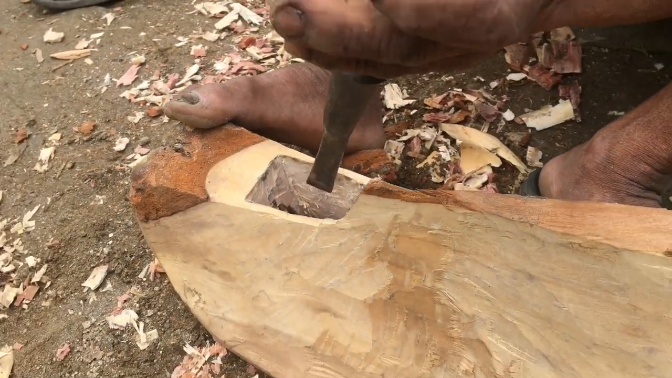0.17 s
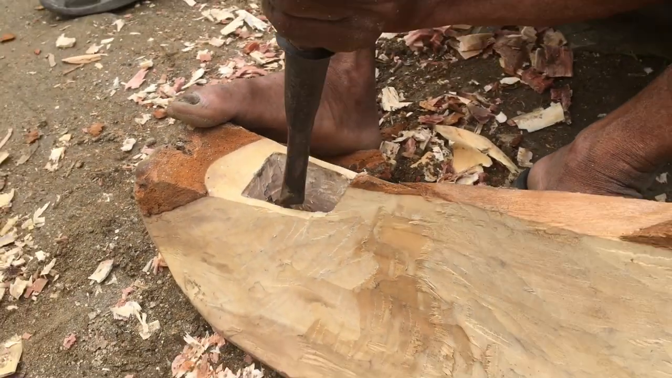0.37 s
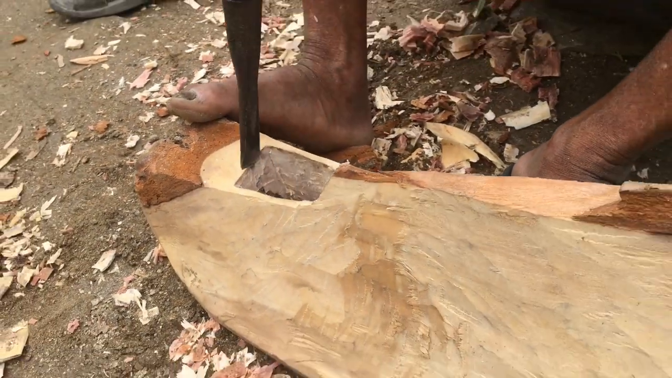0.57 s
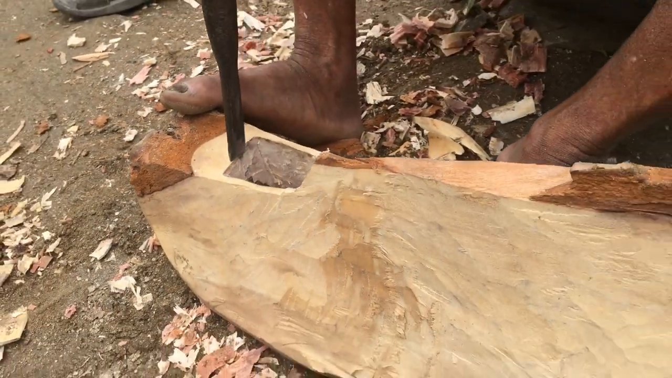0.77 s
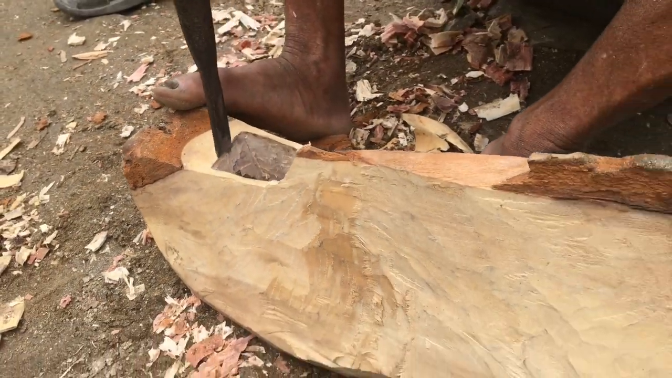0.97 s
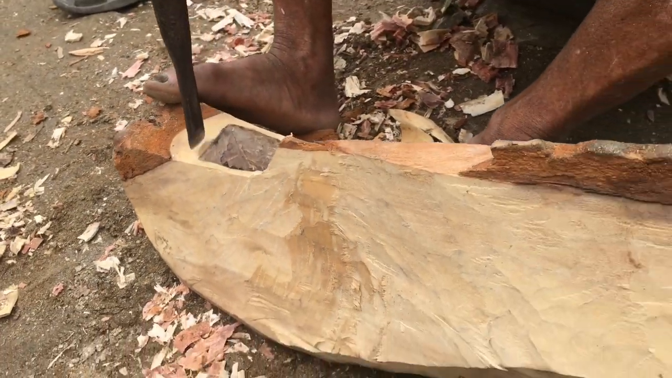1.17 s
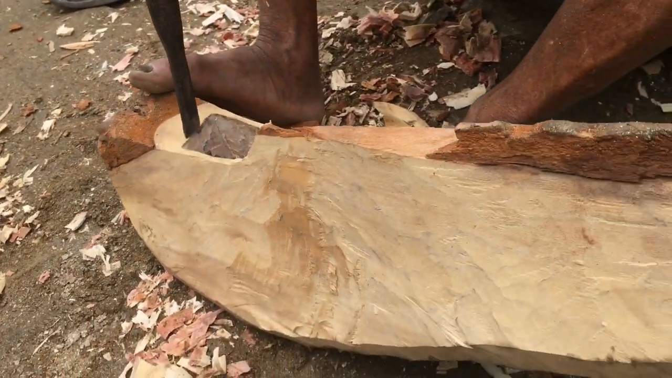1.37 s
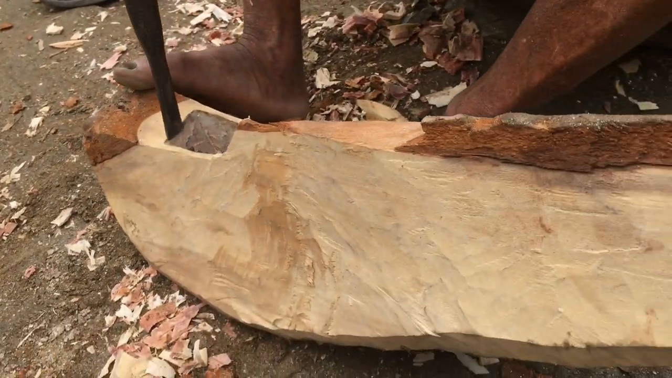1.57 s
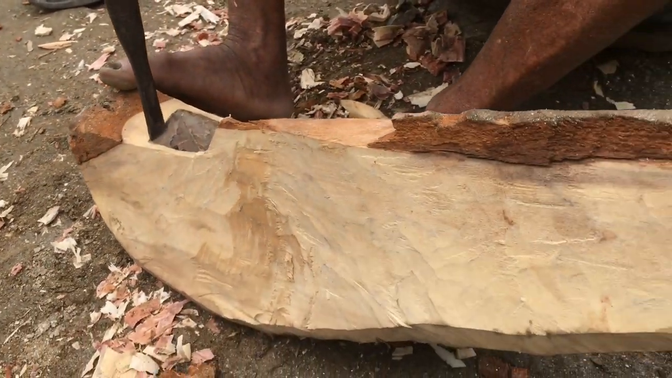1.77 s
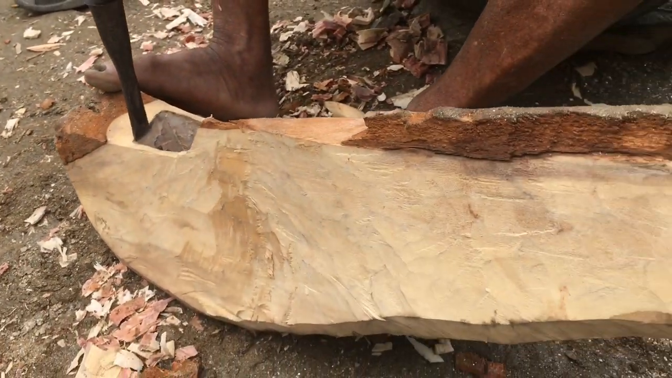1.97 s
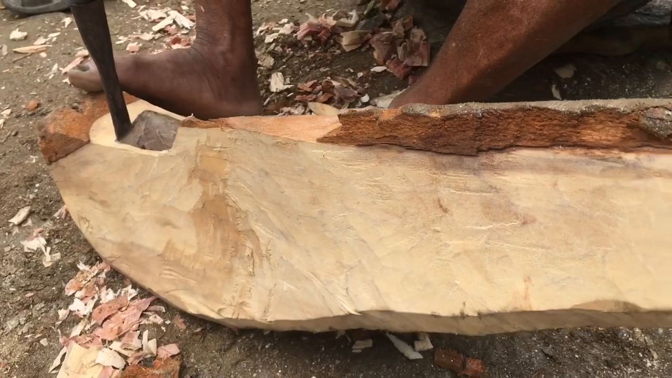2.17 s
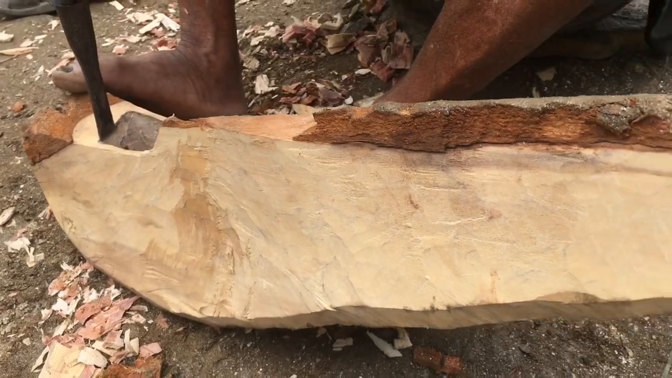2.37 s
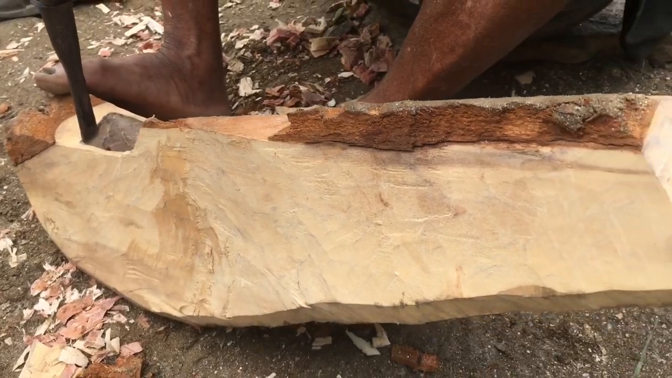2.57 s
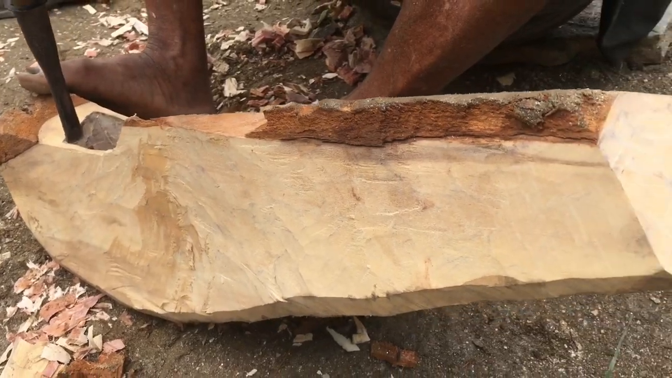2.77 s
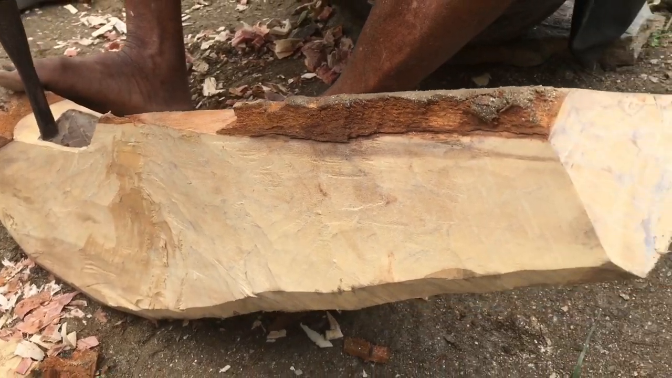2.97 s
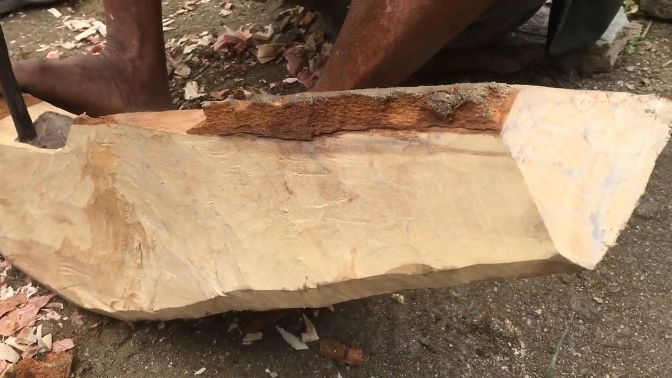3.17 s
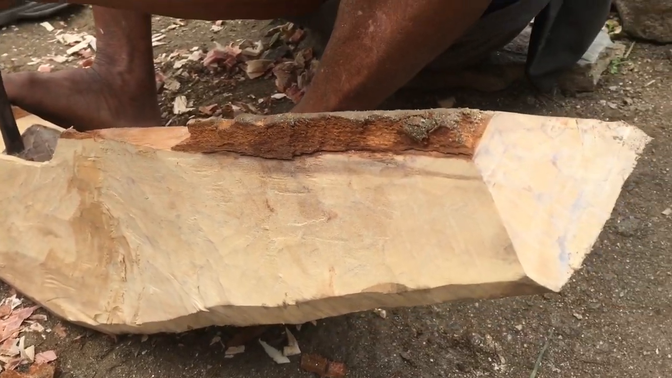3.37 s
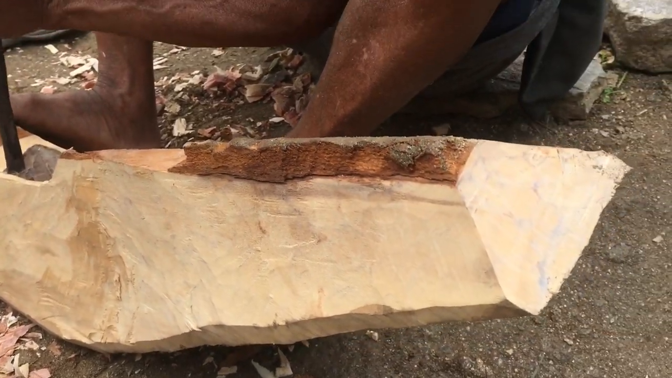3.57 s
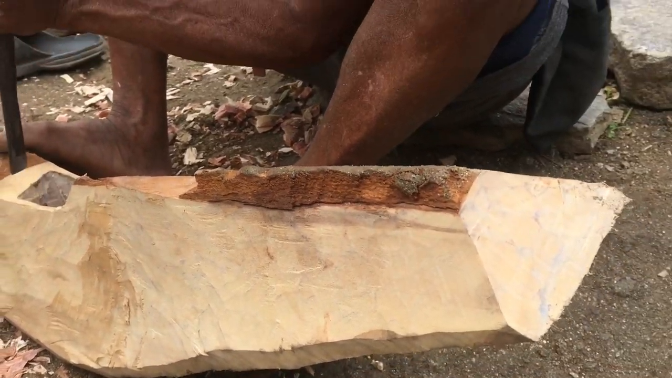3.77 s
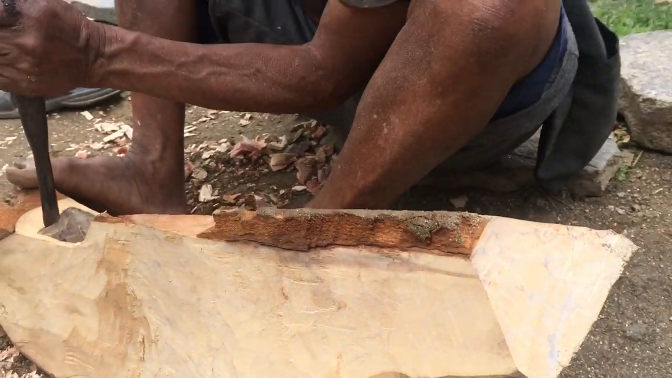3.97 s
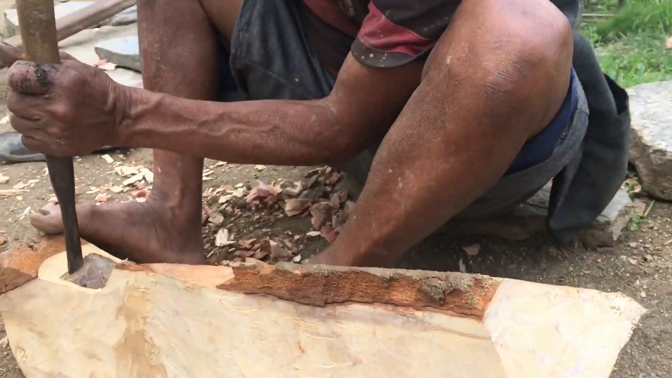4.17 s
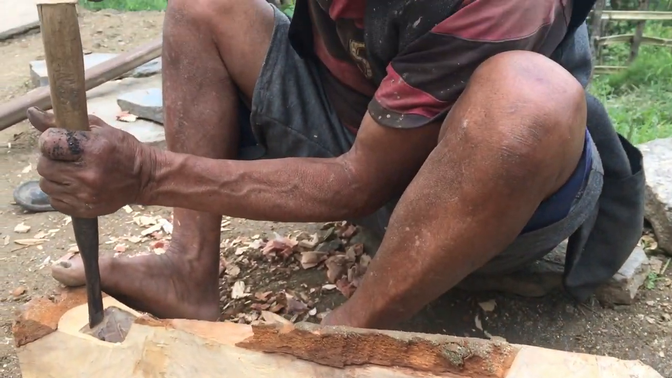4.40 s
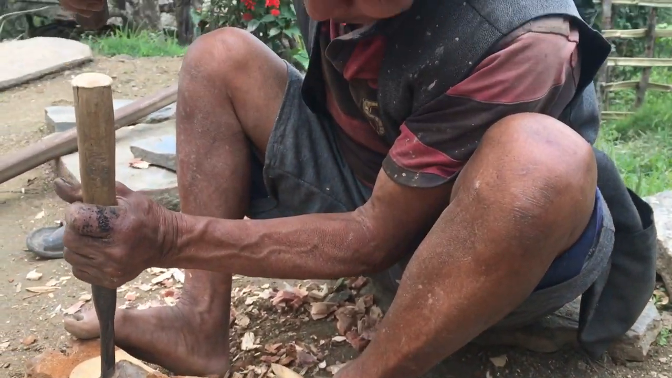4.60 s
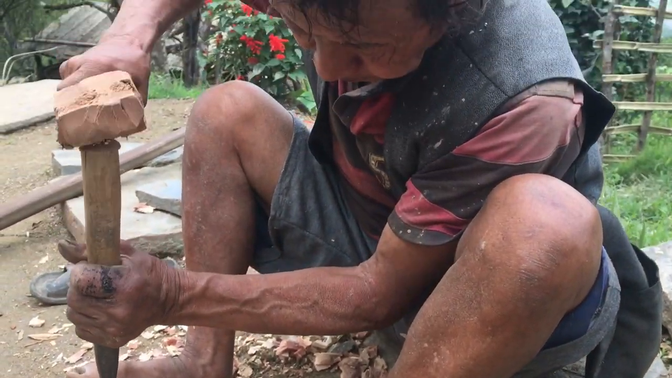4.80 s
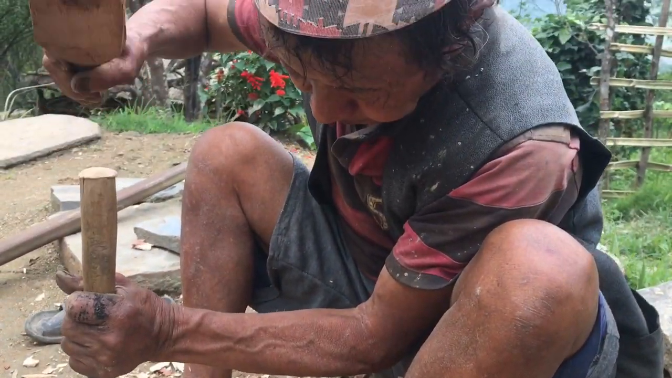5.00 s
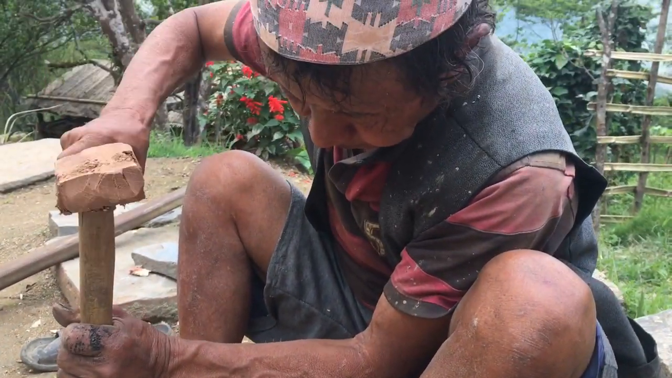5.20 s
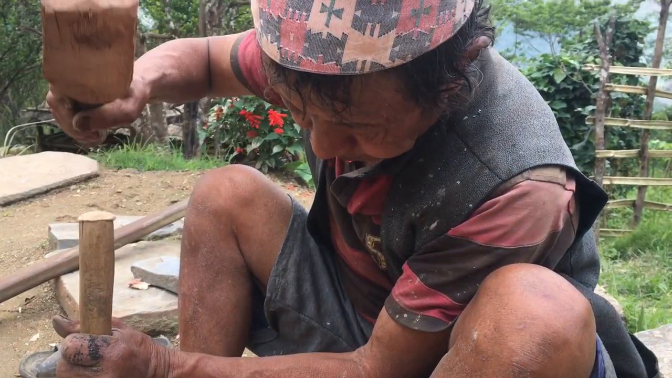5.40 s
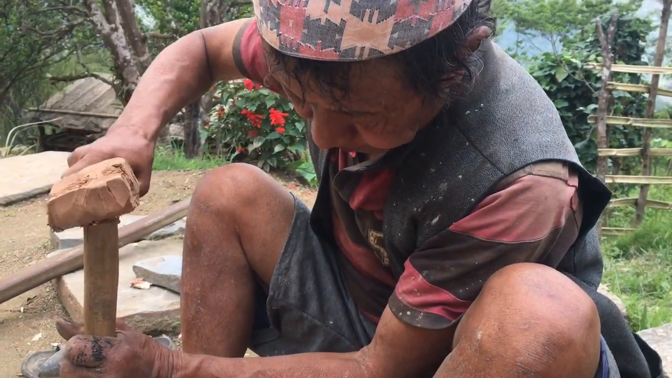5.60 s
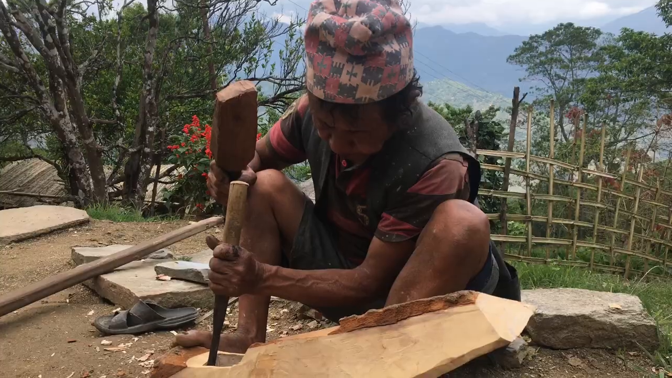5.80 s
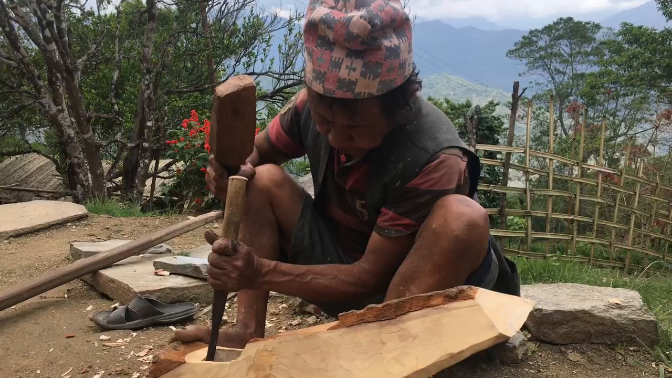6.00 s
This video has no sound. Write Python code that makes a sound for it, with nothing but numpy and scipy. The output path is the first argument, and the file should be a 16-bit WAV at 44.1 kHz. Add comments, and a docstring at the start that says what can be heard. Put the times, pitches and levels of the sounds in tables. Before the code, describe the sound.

A quiet outdoor place, heard in mono close to the work: faint steady insect hiss around 5 kHz, soft leaves, a low far rumble and small lumpy wind buffets, strongest near 3.35 s. Thin gliding bird notes are far off, mostly early. At 0.3-0.5 s a chisel is set on a thick plank with light woody ticks; a dull distant wood knock and a chip snap come at 1.2 s, another small tap near 1.6. A wooden mallet hits the chisel at 2.37 s, harder at 2.73 and 3.11: loud, short, dry cracks with hollow plank tone, low thud and brief grainy echo. In the pause, faint hums and scrapes at 4.1-4.6 s as the blade shifts. Blows return at 4.76, with bright splinters snapping just after, then 5.16 and 5.55, the last strongest. Sound fades quickly to silence by 5.7 s.

```python
"""Outdoors, far insects hiss as bands of noise, leaves rustle, a valley rumbles and gusts buffet the microphone.
Far birds whistle in gliding notes, mostly early on, and dull wood knocks a long way off as decaying noise and tone.
A chisel blade is set down on a thick plank with soft ticks; a wooden mallet then drives it three times, as
bursts of noise and damped modes with echoes. The blade is shifted, the plank hums, single chips snap, and
three more blows fall. The sound fades to silence shortly after the last."""
import sys
import numpy as np
from scipy import signal
from scipy.fft import rfft, irfft, next_fast_len
from scipy.io import wavfile
from scipy.ndimage import uniform_filter1d, map_coordinates

SR = 44100
rng = np.random.default_rng(int(sys.argv[2]) if len(sys.argv) > 2 else 0)


def waveform_to_disk(signal):
    """Save audio, clipped to [-1, 1], as 16-bit WAV at the path in sys.argv[1]."""
    frames = np.transpose(np.atleast_2d(signal))
    scaled = np.clip(frames, -1, 1) * 32767
    samples = np.round(scaled).astype(np.int16)
    wavfile.write(sys.argv[1], SR, samples)


N = 266628

# mallet blows and how strongly each part sounds: t/s, crack level/dB, crack f/Hz, then level/dB of
# ground thud, plank low, plank ring, plank mid, hole, handle, mallet, blade, splinters
BLOWS = [(2.368, -15, 3340, -22.5, -23, -27.5, -29.5, -28, -22, -20.5, -31.5, -30),
         (2.7333, -8, 3970, -18.5, -20, -16.5, -26.5, -25, -14, -23, -22, -25.5),
         (3.1053, -9.5, 3350, -16, -19, -17.5, -23, -28, -16, -18.5, -22, -28),
         (4.755, -14, 3340, -22, -17, -34, -22.5, -19.5, -25, -16.5, -24, -17),
         (5.1638, -7.5, 3240, -20, -15.5, -28, -19.5, -21, -21, -20, -20.5, -29),
         (5.5547, -5, 3450, -19, -16.5, -26, -19, -21, -21, -18.5, -22.5, -28)]
# damped modes of the plank's ring, the handle and the mallet: f/Hz, level/dB, t60/s
PLANK_RING = [(522.5, 0.0053, .12)]
HANDLE = [(1080.2, 2, 0.033), (1203, -14, 0.053)]
MALLET = [(1418, -5, 0.037), (1622.3, 2.5, 0.024)]
# colour of splinters and chips: f/Hz, level per Hz/dB
SPLINTERS = [(4500, -24), (6200, 2.5), (9000, -3.5), (13000, -7), (16000, -14.5)]

DRIFT_DB = 1.2  # scale of the slow drift of rumble and leaves


def amp(db):
    """A level in decibels is the logarithm of an amplitude ratio."""
    return 10 ** (np.asarray(db) / 20)


def unit(x):
    """Dividing by the root mean square gives a signal unit power."""
    return x / np.sqrt(np.mean(x ** 2) + 1e-20)


def along(points, hz):
    """Spectra are interpolated between (f/Hz, value) points on a logarithmic frequency axis."""
    f, v = np.transpose(points)
    return np.interp(np.log(hz + 1), np.log(f + 1), v)


def wobble(rate):
    """Band-limited fluctuation: a smooth curve through random knots, rate knots a second."""
    knots = rng.standard_normal(int(N * rate / SR) + 4)
    return map_coordinates(knots, [np.arange(N) * rate / SR])


def noise(spectrum, size=N):
    """Filtering: white noise weighted in frequency takes the given colour, at rms 1."""
    m = next_fast_len(size)
    white = rfft(rng.standard_normal(m))
    colour = amp(along(spectrum, np.fft.rfftfreq(m, 1 / SR)))
    return unit(irfft(white * colour, m)[:size])


def puff(hz, size):
    """Spectral weighting: broad noise that peaks around one pitch."""
    return noise([(hz / 4, -22), (hz * 0.67, -7), (hz, 0), (hz * 1.5, -7), (hz * 3, -18)], size)


def patchy(x, patchy_db):
    """Time-frequency modulation: patches of random gain, patchy_db rms, make a steady noise uneven."""
    z = signal.stft(x, nperseg=512)[2]
    across_frequency = uniform_filter1d(rng.standard_normal(z.shape), 5, 0)
    field = uniform_filter1d(across_frequency, 12, 1)
    return unit(signal.istft(z * amp(patchy_db * unit(field)), nperseg=512)[1][:N])


def ring(modes, t, rise):
    """Modal decay: damped sinusoids that build up with the time constant rise while contact lasts."""
    t = np.maximum(t, 0)
    decaying = sum(amp(db - 60 * t / t60) * np.sin(2 * np.pi * hz * t) for hz, db, t60 in modes)
    return (1 - np.exp(-t / rise)) * decaying


def note(length, first_hz, last_hz, blur):
    """Frequency glide, fastest at first; blur turns the tone into a fluttering narrow band."""
    u = np.linspace(0, 1, int(length * SR))
    hz = last_hz + (first_hz - last_hz) * (1 - u) ** 1.3
    phase = 2 * np.pi * np.cumsum(hz) / SR
    knots = rng.standard_normal((2, int(length * 350) + 4))
    a, b = (map_coordinates(k, [u * (len(k) - 1)]) for k in knots)
    swell = np.sin(np.pi * u) ** .5
    return swell * ((1 - blur + blur * a) * np.sin(phase) + blur * b * np.cos(phase))


def bursts(rows, edge):
    """Amplitude envelope: superposed swells (t/s, length/s, level/dB) with soft edges."""
    t = np.arange(N) / SR
    total = np.zeros(N)
    for s, length, db in rows:
        to_nearest_end = np.minimum(t - s, s + length - t)
        total += amp(db) * np.clip(to_nearest_end / edge + .5, 0, 1) ** 2
    return total


def add(track, s, sound):
    """Superposition: mix a sound in at time s."""
    part = track[round(s * SR):][:len(sound)]
    part += sound[:len(part)]


def echoes():
    """Diffuse reverberation of unit energy: each frequency decays at its own rate, two walls stand out."""
    # decay of the echoes: f/Hz, t60/s
    yard_t60 = [(100, 0.053), (500, 0.11), (1200, 0.21), (2500, 0.15), (4000, .16), (7000, 0.074),
                (15000, 0.056)]
    # colour of the echoes: f/Hz, level/dB
    yard_tone = [(100, -12), (350, 0.5), (1000, -1), (2000, -7.5), (3000, -18), (5000, -21.5), (8000, -27),
                 (15000, -31)]
    # slaps within the echoes: delay t/s, level relative to the echoes there/dB
    wall_slaps = [(0.02, -6), (.033, 1)]
    hz, t, z = signal.stft(rng.standard_normal(SR // 2), SR, nperseg=256)
    dying_db = -60 * t / along(yard_t60, hz)[:, None]
    fall = amp(dying_db) + amp(-22.5 + 0.37 * dying_db)  # the slopes further off answer longer
    tail = signal.istft(z * amp(along(yard_tone, hz))[:, None] * fall, SR, nperseg=256)[1]
    t = np.arange(len(tail)) / SR
    slaps = sum(amp(db - 60 * np.maximum(t - s, 0) / 0.067) * (t > s) for s, db in wall_slaps)
    tail = tail * (1 + slaps)
    tail = tail * amp(3.2 * wobble(220)[:len(t)])  # scattered, grainy returns
    return tail / np.linalg.norm(tail)


def add_echoes(track, s, sound, echo_db):
    """Energy scaling: the echoes follow the sound's energy, not its ring."""
    add(track, s, np.linalg.norm(sound) * amp(echo_db) * echoes())


def insects():
    """Band noise: far insects merge into a steady hiss."""
    # f/Hz, level per Hz/dB
    insect_colour = [(1760, -46), (3000, -18.5), (3440, -12.5), (3730, -10.5), (4730, -1), (5270, -5),
                     (5820, -11.5), (7500, -24.5), (9750, -51), (16500, -120)]
    return amp(-72.5) * patchy(noise(insect_colour), patchy_db=1.5)


def leaves():
    """Broadband noise whose level drifts slowly: a rustle of leaves."""
    # f/Hz, level per Hz/dB
    leaf_colour = [(300, -6.5), (600, 3.5), (1100, 0.5), (2000, -3.5), (3500, -12), (7000, -16.5),
                   (11000, -24), (16000, -18)]
    return amp(-74 + DRIFT_DB * wobble(1.9)) * patchy(noise(leaf_colour), patchy_db=2.5)


def valley():
    """Low-frequency noise whose level drifts: a far rumble."""
    # f/Hz, level per Hz/dB
    rumble_colour = [(70, -27.5), (120, 4), (190, 2), (300, -3.5), (450, -11), (700, -30.5)]
    return amp(-70.5 + DRIFT_DB * wobble(3)) * patchy(noise(rumble_colour), patchy_db=2.0)


def wind():
    """Amplitude-modulated low noise: gusts buffet the microphone in lumps."""
    # gusts: t/s, length/s, level/dB
    gust_rows = [(.02, .08, -68), (.46, 0.04, -55.5), (.53, 0.04, -55), (.595, 0.11, -53.5),
                 (.735, 0.038, -46), (.808, 0.029, -53), (.866, 0.025, -53), (1.0, .24, -56),
                 (1.393, .1, -56), (1.503, 0.093, -59), (1.63, 0.032, -67), (1.71, 0.29, -58.5),
                 (2.04, 0.085, -52), (2.155, 0.095, -58), (2.89, 0.14, -57), (3.27, 0.072, -55),
                 (3.345, 0.049, -38), (3.414, 0.033, -51), (3.5, 0.13, -53), (3.63, 0.237, -52.5),
                 (3.98, .06, -60), (4.11, 0.05, -51.5), (4.34, 0.052, -53.5), (4.41, 0.07, -47.5),
                 (4.66, 0.056, -58), (4.86, 0.055, -61), (5.02, 0.075, -67.5), (5.38, 0.23, -63.5)]
    # f/Hz, level per Hz/dB
    buffet_colour = [(12, -35), (20, -7.5), (38, -1), (58, 6), (118, -15.5), (156, -18), (200, -26),
                     (260, -54), (440, -120)]
    lull_db = -68  # remains between gusts
    gusts = amp(lull_db) + bursts(gust_rows, edge=.035)
    return gusts * unit(amp(3 * wobble(27)) * noise(buffet_colour))


def birds():
    """Gliding tones: the clearer notes, and a faint twitter of small birds, densest early on."""
    # far notes: t/s, length/s, first f/Hz, last f/Hz, level/dB, blur (0 tone, 1 narrow band)
    bird_notes = [(1.72, .042, 1230, 700, -68, .1), (1.782, .035, 1150, 740, -63, .1),
                  (1.848, .04, 1200, 800, -61, .1), (1.885, .03, 830, 870, -67, .1),
                  (2.535, .045, 1150, 820, -64, .1), (.09, .05, 4350, 4050, -70, .3),
                  (.505, .04, 4150, 4100, -71, .3), (.54, .05, 3900, 3050, -72, .5),
                  (.63, .07, 3900, 3900, -72, .3), (.75, .025, 4200, 3950, -71, .3),
                  (.975, .03, 4200, 3850, -71, .4), (2.97, .04, 3700, 3700, -72, .5),
                  (3.28, .03, 4050, 4050, -71, .5), (.855, .06, 4100, 3300, -72, .5),
                  (1.31, .06, 3900, 3100, -72, .5), (1.94, .22, 2450, 2450, -76, 1),
                  (2.19, .12, 2900, 2950, -75, 1), (3.01, .08, 3950, 4200, -71, .6),
                  (3.23, .03, 3950, 3950, -70, .5), (3.2, .3, 2600, 2550, -77, 1),
                  (4.46, .05, 1100, 880, -70, .6), (4.69, .05, 2720, 2720, -70, .4)]
    out = np.zeros(N)
    for s, length, first_hz, last_hz, db, blur in bird_notes:
        add(out, s, amp(db) * note(length, first_hz, last_hz, blur))
    for when, long, high, glide, loud in rng.random((10, 5)):
        hz = 3200 + 1100 * high
        chirp = note(.03 + .05 * long, hz + 700 * (glide - .3), hz, blur=.4)
        add(out, 5.5 * when ** 2, amp(-77 + 6 * loud) * chirp)
    return out


def far_knocks():
    """Exponential decay: a grainy rustle and a wavering plank tone that die away slowly."""
    # t/s, rustle level/dB, tone level/dB, rustle t60/s
    knock_rows = [(.0580, -62.5, -76, 0.12), (.7450, -69, -69, 0.06), (1.0450, -63.5, -78, 0.095),
                  (1.1970, -56, -59, 0.33), (2.0250, -69, -69.5, 0.19), (3.8850, -64.5, -79, 0.16)]
    # rustle colour: f/Hz, level per Hz/dB
    rustle_colour = [(250, -24), (500, 6.5), (1200, 2.5), (2200, -11), (5000, -19), (12000, -27)]
    out, t = np.zeros(N), np.arange(SR // 2) / SR
    for s, rustle_db, ring_db, t60 in knock_rows:
        rustle = amp(rustle_db + 0.31 * wobble(67)[:len(t)]) * noise(rustle_colour, len(t))
        tone = amp(ring_db + 1.2 * wobble(30)[:len(t)]) * np.sin(2 * np.pi * PLANK_RING[0][0] * t)
        tone = amp(25 * t / t60) * tone  # it outlasts the rustle
        add(out, s, (1 - np.exp(-t / 0.0041)) * amp(-60 * t / t60) * (rustle + tone))
    return out


def scuffs():
    """Clumped noise: dry chips rustle as they shift, and patter after every blow."""
    # chips shift: t/s, length/s, level/dB
    scuff_rows = [(0, 0.081, -78), (.195, 0.046, -72), (.28, 0.085, -74.5), (.46, .06, -81),
                  (2.775, 0.031, -66), (3.3, .15, -81.5), (4.795, 0.072, -69)]
    scatter_db, scatter_s = -65, .05  # chips thrown by a blow: level, how long they patter
    thrown = [(blow[0] + .01, scatter_s, scatter_db) for blow in BLOWS]
    rustle = unit(amp(2.9 * wobble(220)) * noise(SPLINTERS))
    return bursts(scuff_rows + thrown, edge=0.024) * rustle


def ticks():
    """Impulsive noise: single chips snap, short and bright, with echoes."""
    # t/s, level/dB, peak f/Hz
    snap_rows = [(0.2745, -52, 5300), (1.198, -49, 5900), (1.681, -53, 3750), (3.584, -63.5, 11080),
                 (4.7964, -54, 9460), (4.8336, -42, 6860), (4.847, -52, 4500)]
    t60_s, echo_db = 0.015, -6.5
    out, t = np.zeros(N), np.arange(SR // 5) / SR
    for s, db, hz in snap_rows:
        tick = amp(db - 60 * t / t60_s) * puff(hz, len(t))
        add(out, s, tick)
        add_echoes(out, s, tick, echo_db)
    return out


def scrapes():
    """Resonance: plank and handle hum faintly at their own pitch as the blade is shifted."""
    # t/s, length/s, plank level/dB
    scrape_rows = [(4.14, 0.085, -66.5), (4.23, 0.081, -68), (4.407, 0.069, -64.5), (4.51, 0.055, -67.5)]
    out, plank_hz, handle_hz = np.zeros(N), PLANK_RING[0][0], HANDLE[0][0]
    for s, length, db in scrape_rows:
        plank = note(length, plank_hz, plank_hz, blur=0.26)
        handle = amp(-7.5) * note(length, handle_hz, handle_hz, blur=0.48)
        add(out, s, amp(db) * (plank + handle))
    return out


def taps():
    """Light impact as the blade is set down: a noise tick, a ring at its pitch, knocks damped by the hand."""
    # t/s, tick level/dB, tick f/Hz, ring level/dB, then knock level/dB of plank, handle, mallet
    tap_rows = [(.3345, -53.5, 2585, -43, -54.5, -44.5, -38.5), (.3685, -56.5, 4120, -63, -83, -65, -58),
                (.4567, -58.5, 3510, -60, -47.5, -54, -52), (.4654, -69, 1240, -44.5, -46.5, -69, -57),
                (1.5669, -72, 2370, -63, -58.5, -43.5, -59)]
    t60_s, echo_db = 0.03, -18
    out, t = np.zeros(N), np.arange(SR // 5) / SR
    for s, db, hz, ring_db, plank_db, handle_db, mallet_db in tap_rows:
        tap = amp(db - 60 * t / t60_s) * puff(hz, len(t))
        tap += ring([(hz, ring_db, t60_s)], t, rise=0.00021)
        tap += amp(plank_db) * ring(PLANK_RING, t, rise=0.00076)
        knock = amp(handle_db) * ring(HANDLE, t, rise=0.0007)
        knock += amp(mallet_db) * ring(MALLET, t, rise=0.00022)
        tap += amp(-60 * t / 0.075) * knock  # the hand's damping
        add(out, s, tap)
        add_echoes(out, s, tap, echo_db)
    return out


def mallet():
    """Impact excitation: the face cracks on the handle, the shock runs down, heavier parts answer later."""
    # damped modes of the ground, plank, hole and blade: f/Hz, level/dB, t60/s
    thud_modes = [(63.5, 2, 0.085), (171, -6.5, 0.048)]
    low_modes = [(293, 0.5, 0.022), (354.5, -3.5, 0.044)]
    mid_modes = [(642, -5.5, 0.067), (693.3, 3.5, .03)]
    hole_modes = [(1005, -2, .026), (905, -2, .026)]
    blade_modes = [(1857, -2.5, 0.017), (1959, 1, 0.022), (2205, -6, 0.025), (2372, -6.5, 0.027)]
    out, t = np.zeros(N), np.arange(SR // 2) / SR
    pressed = 1 + 1.7 / (1 + (t / 0.0086) ** 6)  # louder while the mallet still drives the blade
    bite = (1 - np.exp(-t / 0.0021)) / (1 + (t / 0.028) ** 6)  # fibres tear until the blade stops
    for (s, crack_db, crack_hz, thud_db, low_db, ring_db, mid_db, hole_db,
         handle_db, mallet_db, blade_db, splinter_db) in BLOWS:
        blow = amp(crack_db - 60 * t / 0.015) * bite * puff(crack_hz, len(t))
        blow += amp(splinter_db - 60 * t / 0.0068) * bite * noise(SPLINTERS, len(t))
        # each part answers after its own delay
        blow += amp(blade_db) * pressed * ring(blade_modes, t - .001, rise=0.00084)
        blow += amp(mallet_db) * pressed * ring(MALLET, t - .0012, rise=0.0015)
        blow += amp(hole_db) * pressed * ring(hole_modes, t - .0015, rise=0.0014)
        blow += amp(handle_db) * pressed * ring(HANDLE, t - .0016, rise=0.0025)
        blow += amp(mid_db) * pressed * ring(mid_modes, t - .0022, rise=0.0018)
        blow += amp(ring_db) * ring(PLANK_RING, t - .0024, rise=0.0011)
        blow += amp(low_db) * pressed * ring(low_modes, t - .0026, rise=0.0033)
        thud = amp(thud_db) * ring(thud_modes, t - .008, rise=0.02)
        add(out, s, blow + thud)
        add_echoes(out, s, blow, echo_db=-16.5)
    return out


def scene():
    """Superposition of all sources, from the background to the mallet, in one channel."""
    background = insects() + leaves() + valley() + wind() + birds() + far_knocks()
    work = scuffs() + ticks() + scrapes() + taps() + mallet()
    return (background + work)[None]


def record(dry):
    """Saturation and band limit: the input bends at full scale, the sound fades out, the top rolls off."""
    input_db, full_scale = 5, 1
    end_s, fade_s = 5.692, .04  # silence from end_s, after a fade this long
    top_hz, rolloff_hz = 16800, 1700  # nothing above top_hz; width of the slope below it
    loud = amp(input_db) * dry
    held = loud / (1 + np.abs(loud / full_scale) ** 8) ** (1 / 8)
    fade = np.clip((end_s - np.arange(N) / SR) / fade_s, 0, 1)
    m = next_fast_len(N + SR // 4)
    edge = np.clip((top_hz - np.fft.rfftfreq(m, 1 / SR)) / rolloff_hz, 0, 1) ** 2.5
    return irfft(rfft(held * fade, m) * edge, m)[..., :N]


dry = scene()
out = record(dry)
waveform_to_disk(out)
```